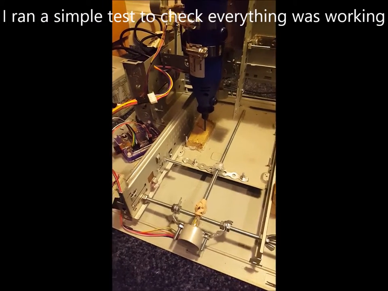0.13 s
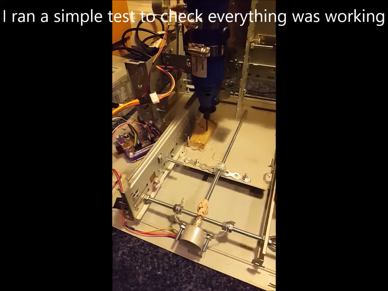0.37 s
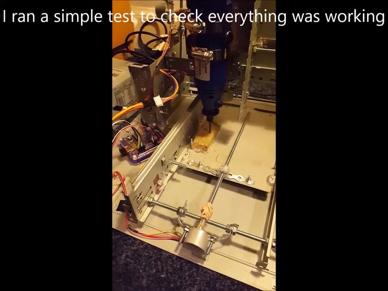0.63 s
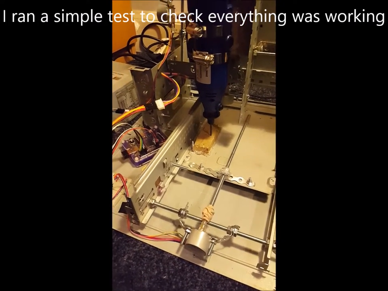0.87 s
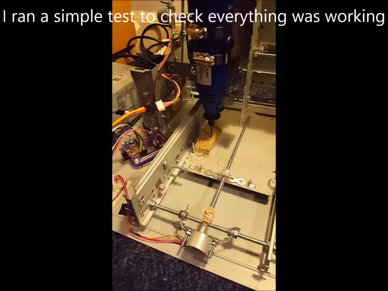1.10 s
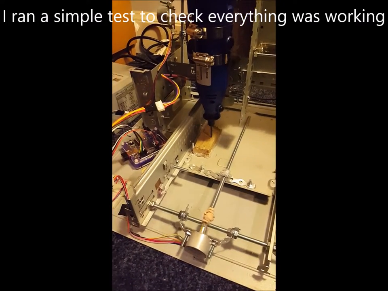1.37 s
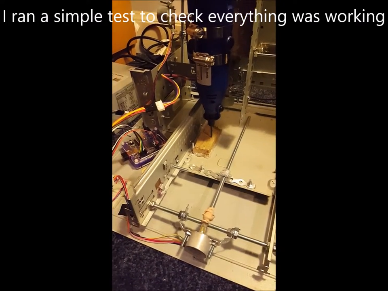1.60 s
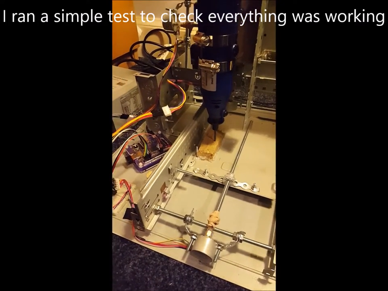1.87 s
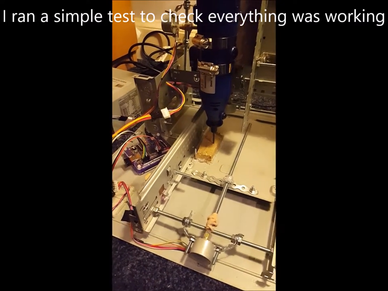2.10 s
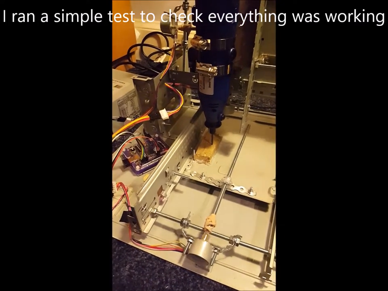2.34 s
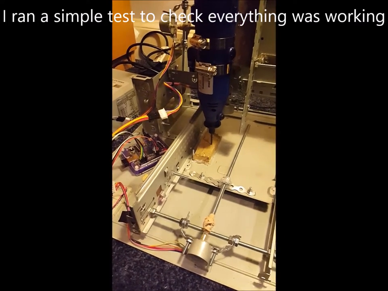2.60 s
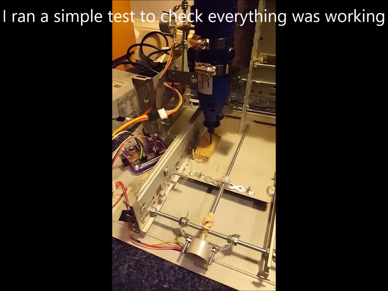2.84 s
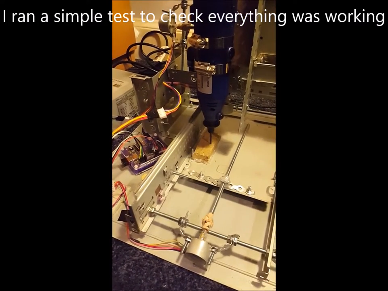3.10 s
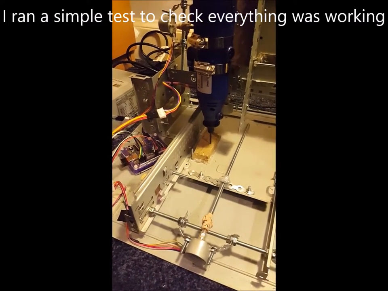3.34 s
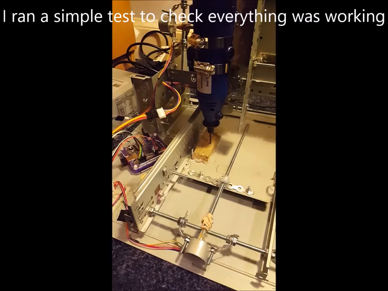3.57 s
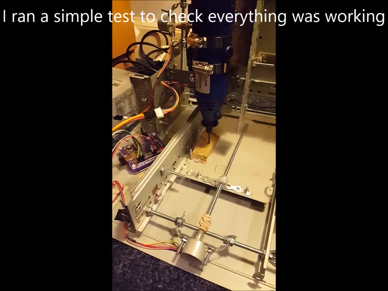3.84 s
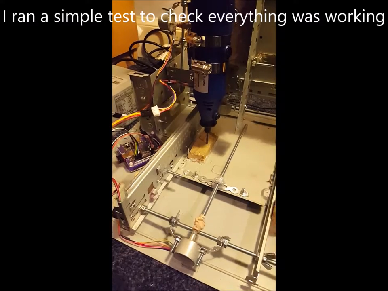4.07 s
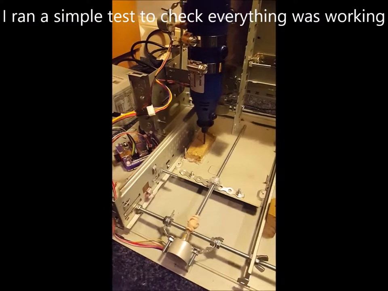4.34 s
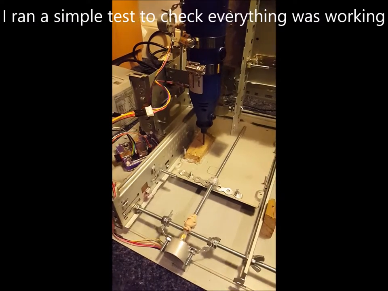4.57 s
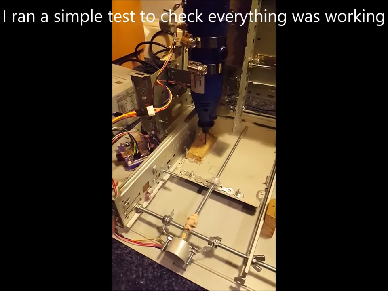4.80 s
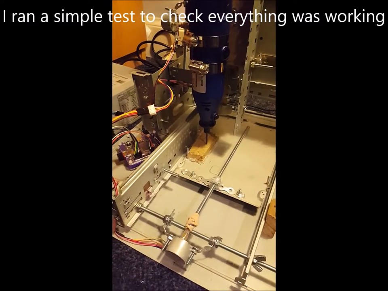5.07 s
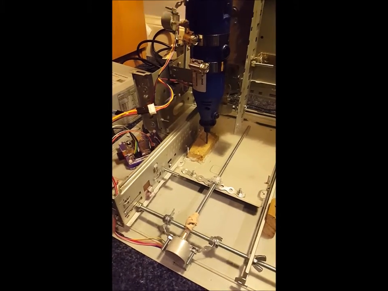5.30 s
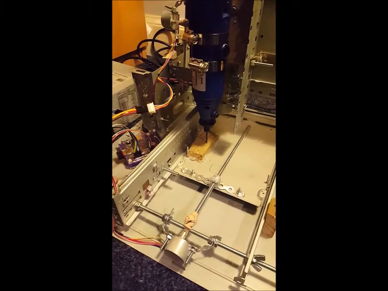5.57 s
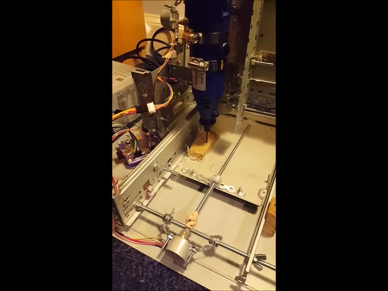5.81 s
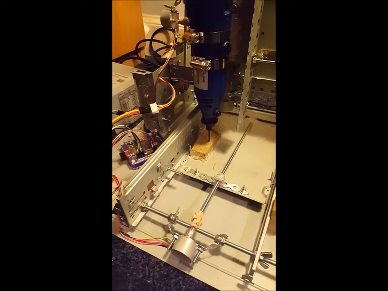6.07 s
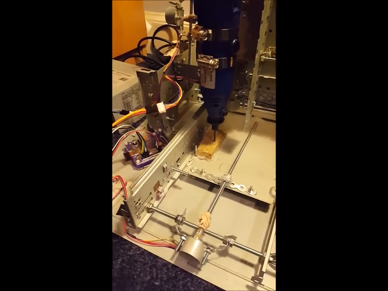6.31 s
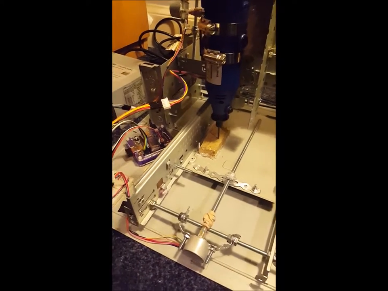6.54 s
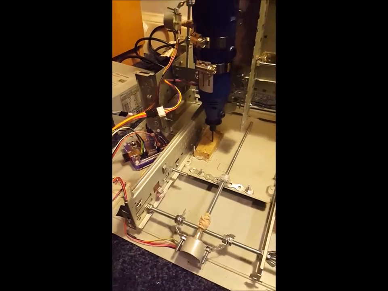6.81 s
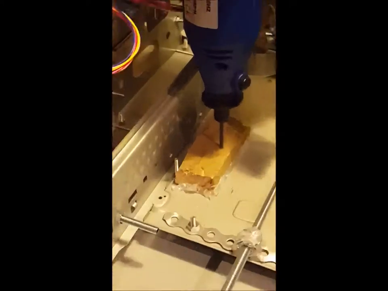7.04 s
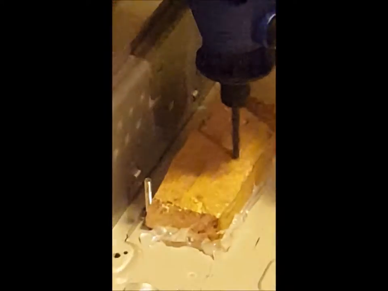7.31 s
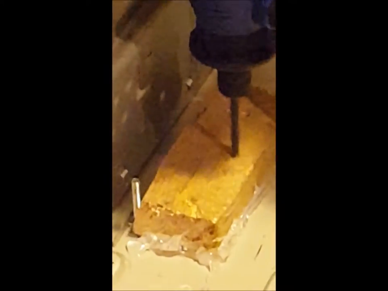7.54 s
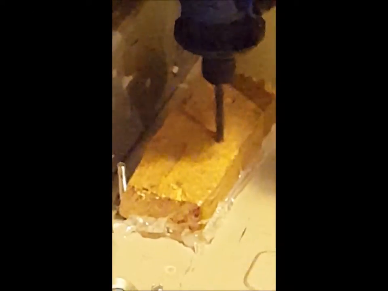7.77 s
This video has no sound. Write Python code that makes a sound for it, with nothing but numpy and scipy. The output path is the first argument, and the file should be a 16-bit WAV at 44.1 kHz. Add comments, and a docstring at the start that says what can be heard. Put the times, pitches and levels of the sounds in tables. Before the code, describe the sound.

Steady electric spindle whine, buzzy and metallic, with many stacked overtones beating gently against each other. Bright, grainy hiss from torn wood and cooling air rides on top, and the frame adds a midrange rattling rush. Loudness and colour drift with the load, strongest near four seconds, never stopping. Close, fairly dry room, slightly wide stereo.

```python
"""Rotary tool cutting wood

A small rotary tool on a home-built machine spins near 20 000 turns a minute as its bit feeds into wood.
Shaft orders, a bearing that slips slightly behind the shaft, a slow whirl and mains ripple sum to the whine.
Frame noise, chips and cooling air are filtered noise pulsing with shaft and whirl, over a low hum and rumble.
Two spaced microphones hear it: the noise differs between them and partly reaches the right one later."""
import sys
import numpy as np
from scipy import signal
from scipy.fft import rfft, irfft, next_fast_len
from scipy.io import wavfile
from scipy.ndimage import uniform_filter1d

SR = 44100
rng = np.random.default_rng(int(sys.argv[2]) if len(sys.argv) > 2 else 0)


def bounce(signal):
    """Save signal as a 16-bit WAV file at the path given by the first command-line argument."""
    frames = np.transpose(np.atleast_2d(signal))
    limited = np.clip(frames, -1, 1)
    pcm = np.round(limited * 32767).astype(np.int16)
    wavfile.write(sys.argv[1], SR, pcm)


def natural_amplitude(level_db):
    """Convert a level in decibels to a linear amplitude factor, elementwise."""
    exponent = np.asarray(level_db, float) / 20
    return 10 ** exponent


N = 348831
RIPPLE_HZ = 100  # mains ripple


def unit(x):
    """Scaled to rms 1."""
    return x / np.sqrt(np.mean(np.abs(x) ** 2) + 1e-20)


def along(points, hz):
    """Reads (f/Hz, value) points on a log frequency axis."""
    f, v = np.transpose(points)
    return np.interp(np.log(hz + 1), np.log(f + 1), v)


def curves(rows):
    """One value per sample for each column after the time."""
    s, *cols = np.transpose(rows)
    return [np.interp(np.arange(N) / SR, s, c) for c in cols]


def wobble(rate):
    """A random curve with rate knots a second, joined by straight lines."""
    knots = rng.standard_normal(int(8 * rate) + 2)
    return np.interp(np.arange(N) * rate / SR, np.arange(len(knots)), knots)


def angle(hz):
    """Running phase of a frequency curve, in radians."""
    return 2 * np.pi * np.cumsum(hz) / SR


def bump(s, db, half_s):
    """A smooth swell or dip in dB around a moment; half_s is where it has fallen to 1/e."""
    return db * np.exp(-((np.arange(N) / SR - s) / half_s) ** 2)


# The strongest partials: shaft order, bearing slips
STRONG_PARTIALS = [(1, 0), (2, 0), (4, 0), (5, 0), (7, 1), (8, 1), (9, 1), (11, 1), (12, 1), (13, 1),
                   (10, 1), (16, 2), (17, 2), (18, 2), (3, 0)]
# How each strong partial answers: load/(dB per dB), whirl/(dB per dB), full lasting shift/dB,
# first wandering/dB, second wandering/dB
STRONG_ANSWERS = [(0.78, -0.047, -0.9, -0.5, 2.5), (1.49, -0.099, 1.4, 0.9, -0.4),
                  (0.88, 0.088, -2.1, -1, 5), (1.47, -0.007, 0.8, -2, -4.5), (0.9, -0.17, 1.5, -0.5, 1.5),
                  (0.96, 0.032, 10.5, -3, 2.5), (1.6, 0.058, -0.6, 0.16, 0.1), (1.2, -0.086, -5, -0.3, 4.5),
                  (3, -0.28, 8.5, 4, -0.5), (3.04, -0.53, 4, 6, -0.7), (1.2, -0.0044, -1, 0, -1.5),
                  (2.9, -0.23, 5, 2.5, -2), (1.5, -0.06, -2, 1.5, -4), (2.8, -0.16, 13, 2.5, 0.1),
                  (2.03, -0.16, 1.5, -1, 2)]


def strong_swells(load_db, shake_db, drifts):
    """Each strong partial gains or loses level with load, whirl and the drifts of the whine's colour."""
    return dict(zip(STRONG_PARTIALS, np.array(STRONG_ANSWERS) @ [load_db, shake_db, *drifts]))


# Whine partials: shaft order, bearing slips subtracted
WHINE_ORDERS = [(1, 0), (2, 0), (3, 0), (4, 0), (5, 0), (6, 0), (7, 0), (8, 0), (9, 0), (13, 0), (17, 0),
                (19, 0), (21, 0), (23, 0), (24, 0), (25, 0), (26, 0), (29, 0), (6, 1), (7, 1), (8, 1),
                (9, 1), (10, 1), (11, 1), (12, 1), (13, 1), (14, 1), (15, 1), (16, 1), (17, 1), (20, 1),
                (22, 1), (23, 1), (16, 2), (17, 2), (18, 2), (19, 2), (20, 2), (21, 2), (22, 2), (23, 2),
                (24, 2), (25, 3), (26, 3), (28, 3)]
# The same partials in an ordinary cut: mid level/dB, side minus mid/dB, side phase/rad,
# whirl sideband below/dB, whirl sideband above/dB
WHINE_LEVELS = [(-48, -8.5, 1.44, -21, -29), (-43, -7, 1.0, -17, -23.5), (-55, -0.5, 1.5, -12.5, -14),
                (-45, 2, 1.63, -17.5, -35), (-45.5, 0, 1.03, -13, -12.5), (-59.5, -2, -1, -9, -34),
                (-50.5, 4, 0.3, -12, -17), (-51, -8, 2, -12, -15), (-50, 2, 5.5, -15, -13),
                (-52.6, -3.1, 0, -13, -9), (-62, 6, 2.5, -20, -13), (-55, -1.1, -1, -10, -19),
                (-63, 2.9, 1.3, -13, -18), (-56.5, -1.0, 2.9, -17, -15), (-66, -8, -2, -19, -15),
                (-63.1, -1, -3, -16, -16), (-65, -8, -0.1, -16, -22), (-66.1, -1.6, 1, -16, -19),
                (-53, 5, 1.5, -18, -23), (-46.5, 9, 0, -8, -13), (-45, 4, 2, -22, -18),
                (-36, -13, 3.5, -18, -14), (-44.5, 3.8, 2, -17, -5.5), (-43.5, -0.3, -2.16, -8.5, -9.5),
                (-47, -2, -1.6, -9, -6), (-49, 2.5, -2.0, -10, -17), (-55, 2, -4, -16, -13),
                (-58, -4.0, 3, -22, -10), (-54.5, -2.1, -5, -14, -7), (-64, -1, 4, -5, -20),
                (-64, -0.1, -1, -13, -7), (-61.0, 7, 2.5, -12, -2), (-61, -5, 1.5, -8, -6),
                (-51.5, 1, -2.5, -24, -17), (-52, -9, -2.8, -4, -6), (-52, -3, 3.5, -8, -11.5),
                (-55, -4, 3, -1, -7), (-61, -0.3, -1.5, -11, -3), (-55.5, 8, 1.7, -10, -7),
                (-59.5, 1, 3, -14, -12), (-55, -3, 1.5, -6, -11), (-60, -2, 1, -10, -10),
                (-60.5, 0, 1, -12, -12), (-62, 0, -2, -10, -10), (-67, 0, 0, -10, -10)]
# Sidebands of shaft orders 1 to 9 in an ordinary cut: mains below/dB, mains above/dB,
# twice the whirl below/dB, ball cage above/dB
ORDER_SIDEBANDS = [(-34, -25, -40, -33), (-33, -17, -40, -23), (-14, -19, -29, -20), (-16, -12, -14, -24),
                   (-19, -15, -26, -15), (-12, -17, -10, -16), (-27, -18, -28, -9), (-9, -10, -18, -15),
                   (-19, -18, -22, -16)]
# Moments when all bearing partials sink: t/s, level/dB, half length/s
BEARING_DIPS = [(1.09, -5.5, .1), (1.745, -9, 0.084), (3.995, -4, 0.12)]
# Moments when one partial alone swells or sinks: t/s, level/dB, half length/s
PARTIAL_FLARES = [(0.802, 4, .12), (2.9, -7, 0.074), (3.17, 2.5, 0.21), (3.45, -10, 0.062),
                  (5.85, -4, 0.33), (6.2, -3, .12), (6.7, 4.5, 0.13), (6.7, -2, .12), (7.448, 3, 0.23)]
# The partial each of these moments belongs to: shaft order, bearing slips
FLARING_PARTIALS = [(9, 1), (4, 0), (4, 0), (4, 0), (10, 1), (8, 1), (11, 1), (18, 2), (5, 0)]


def whine(shaft, slip, whirl, load_db, whirl_db, swells):
    """Rotating partials carry whirl, mains and ball cage sidebands and drift between the microphones."""
    cage_per_turn = .422  # ball cage turns per shaft turn
    mains = np.exp(1j * angle(np.full(N, RIPPLE_HZ)))
    cage = np.exp(1j * cage_per_turn * shaft)
    sidebands = dict(enumerate(ORDER_SIDEBANDS, 1))
    dip_db = sum(bump(*dip) for dip in BEARING_DIPS)
    mid, side = np.zeros(N), np.zeros(N)
    for partial, (db, side_db, side_rad, below_db, above_db) in zip(WHINE_ORDERS, WHINE_LEVELS):
        order, slips = partial
        # random phases, so the sidebands do not all pulse together
        turn = np.exp(2j * np.pi * rng.random(7))
        wander = wobble(2.346)
        if partial in swells:
            level_db = db + swells[partial] + 0.19 * order * wander
        else:
            level_db = db + load_db + 2.36 * wander
        level_db = level_db + (slips > 0) * dip_db
        for flare, flaring in zip(PARTIAL_FLARES, FLARING_PARTIALS):
            if flaring == partial:
                level_db += bump(*flare)

        flutter = 0.009 * order * (wobble(30) + 1j * wobble(30))  # higher orders are rougher
        whirling = natural_amplitude(below_db) * turn[0] * whirl.conj() + natural_amplitude(above_db) * turn[1] * whirl
        if slips == 0 and order in sidebands:
            under_db, over_db, twice_db, cage_db = sidebands[order]
            whirling += natural_amplitude(twice_db) * turn[2] * whirl.conj() ** 2
            flutter += natural_amplitude(under_db) * turn[3] * mains.conj() + natural_amplitude(over_db) * turn[4] * mains
            flutter += natural_amplitude(cage_db) * turn[5] * cage
        # plain orders 7 to 13 sound weaker, so they beat gently against the slipping partials
        bare = .45 if slips == 0 and order in range(7, 14) else 1
        beat = bare + flutter + natural_amplitude(whirl_db + 0.44 * wobble(4.8)) * whirling
        tone = np.sqrt(2) * turn[6] * beat * np.exp(1j * (order * shaft - slips * slip))
        mid += natural_amplitude(level_db) * tone.real

        # the side follows the mid level only in part
        side_level_db = side_db + 0.48 * level_db + 0.53 * (db + load_db) + 0.041 * order * wobble(2.16)
        side_phase = side_rad + 0.079 * order * wobble(1.5)
        side += natural_amplitude(side_level_db) * (tone * np.exp(1j * side_phase)).real
    return np.array([mid + side, mid - side])


# Likeness of the noise at the two microphones: f/Hz, likeness (held within 0 to 1)
MIC_LIKENESS = [(60, 0.6), (500, 0), (1500, 1.64), (2200, -0.04), (8000, 0.23), (15000, -0.9)]
# Tilt of the noise between them: f/Hz, left minus right level/dB
MIC_TILT = [(60, -1), (600, -1.5), (1500, 9.5), (2500, 4.5), (3700, 1.5), (5500, -5.5), (8000, -1),
            (9300, 8.5), (11000, 1.5), (13000, 2), (15500, 3)]


def rush(spectrum, gate, patchy_db):
    """Stereo noise of rms 1, gated at the source, in random patches; the shared part reaches the right later."""
    right_lag_s = 0.00019
    grains = signal.stft(rng.standard_normal((2, N)) * gate, nperseg=512)[2]
    field = uniform_filter1d(rng.standard_normal(grains.shape[1:]), 5, 0)
    field = unit(uniform_filter1d(field, 12, 1))
    pair = signal.istft(grains * natural_amplitude(patchy_db * field), nperseg=512)[1][:, :N]
    m = next_fast_len(N + 8192)
    hz = np.fft.rfftfreq(m, 1 / SR)
    shared, own = rfft(pair, m) * natural_amplitude(along(spectrum, hz))
    alike = np.clip(along(MIC_LIKENESS, hz), 0, 1)
    tilt = natural_amplitude(along(MIC_TILT, hz) / 2)
    late = shared * np.exp(-2j * np.pi * hz * right_lag_s)
    right = alike * late + np.sqrt(1 - alike ** 2) * own
    return unit(irfft([shared * tilt, right / tilt], m)[:, :N])


def bite(shaft, sharp, spread_db):
    """A short burst once a turn, of uneven strength, as a flute tears a chip."""
    turns = ((shaft + np.pi) / (2 * np.pi)).astype(int)
    strength = natural_amplitude(spread_db * rng.standard_normal(turns[-1] + 1))
    return strength[turns] * np.exp(sharp * (np.cos(shaft) - 1))


def strike(tears, depth, whirl, whirl_depth_db):
    """Steady noise plus the bursts of the flutes, all stronger at one point of the whirl."""
    return (1 + depth * tears) * natural_amplitude(whirl_depth_db * whirl.real)


# Colour of the frame noise: f/Hz, relative level/dB
FRAME_SPECTRUM = [(40, -48), (100, -27), (150, -16.5), (450, -12.5), (550, -11.5), (750, -5.5),
                  (900, -12.5), (1050, -10.5), (1220, -1.5), (1500, -3), (1850, 1.5), (2150, -4.5),
                  (2600, -4), (3500, -13)]


def frame_noise(tears, whirl, load_db, shake_db, shift):
    """The frame answers the cut with mid-band noise that grows with load and whirl."""
    level_db = -39.5 + 0.82 * load_db + 0.1 * shake_db - 0.5 * shift
    noise = rush(FRAME_SPECTRUM, strike(tears, 0.21, whirl, 0.32), patchy_db=1.5)
    return natural_amplitude(level_db + 0.54 * wobble(6)) * noise


# Colour of the chip noise: f/Hz, relative level/dB
CHIP_SPECTRUM = [(1300, -50), (2100, -20.5), (2500, -7), (3100, 0.5), (3500, -2), (4100, 0.5), (4950, -3.5),
                 (5900, -2), (6500, -1), (7500, 0), (8500, 0), (9500, -11.5), (11000, -25)]


def chip_noise(tears, whirl, chip_db):
    """Torn chips hiss in the treble, in bursts once a turn over a steady floor."""
    noise = rush(CHIP_SPECTRUM, strike(tears, 0.42, whirl, 0.88), patchy_db=0.95)
    return natural_amplitude(chip_db + 2.0 + 0.58 * wobble(12)) * noise


# Colour of the cooling air: f/Hz, relative level/dB
AIR_SPECTRUM = [(5000, -50), (8000, -21), (10400, -8), (11500, -1), (12800, 4), (14500, 0.5), (15700, -4)]


def cooling_air(tears, whirl, load_db, shake_db):
    """Cooling air hisses in the high treble, in step with the shaft."""
    level_db = -40 + 0.79 * load_db + 0.025 * shake_db
    noise = rush(AIR_SPECTRUM, strike(tears, .35, whirl, .8), patchy_db=0.1)
    return natural_amplitude(level_db + .4 * wobble(12)) * noise


# Mains hum of the motor windings at ripple multiples 1 to 3, in an ordinary cut: level/dB
HUM_LEVELS = [-68.5, -66.5, -68.5]
# Colour of the rumble in the bench: f/Hz, relative level/dB
BENCH_SPECTRUM = [(20, -26), (35, -10), (55, 4), (80, 0), (150, -15), (250, -28), (500, -60)]


def hum(whirl, whirl_tone_db, load_db):
    """Mains hum, and the whirl itself as a nearly centred tone and a low rumble in the bench."""
    t = np.arange(N) / SR
    windings = np.zeros(N)
    for multiple, db in enumerate(HUM_LEVELS, 1):
        windings += natural_amplitude(db + 0.78 * wobble(6.6)) * np.sin(2 * np.pi * multiple * RIPPLE_HZ * t)
    tones = np.sqrt(2) * (natural_amplitude(load_db) * windings + natural_amplitude(whirl_tone_db) * whirl.real)
    tones = tones * natural_amplitude([[-.6], [.6]])  # slightly to the right
    rumble_gain = natural_amplitude(whirl_tone_db - 8.0) + natural_amplitude(2.4 * load_db - 67)
    return tones + rumble_gain * rush(BENCH_SPECTRUM, 1, patchy_db=4.0)


# Motion of the tool: t/s, shaft f/Hz, bearing slip behind the shaft f/Hz, whirl f/Hz
TOOL_SPEED = [(0, 331.3, 4.5, 57.3), (.5, 331.06, 3.5, 57.5), (.84, 330.75, 2.5, 57.6),
              (1.01, 331.31, 6, 57), (1.51, 332.8, 8.5, 57.6), (1.68, 332.9, 6.4, 56),
              (1.85, 333.45, 10, 56.4), (2.02, 333, 7.9, 56.4), (2.19, 333.3, 7.6, 56.1),
              (2.69, 332.58, 6.4, 55.8), (3.1, 332.1, 8.1, 57.1), (3.53, 332.14, 7.2, 57.2),
              (3.7, 331.44, .9, 58.6), (3.87, 331.67, 7.3, 58.2), (4.04, 332.38, 6.6, 58),
              (4.38, 332.54, 7.5, 58.4), (4.54, 333.16, 7.5, 57), (5.39, 333.25, 7.4, 57.1),
              (5.68, 332.33, 4.2, 57.4), (6.06, 332.28, 5.2, 57), (6.56, 331.9, 1.6, 58.1),
              (6.9, 332.16, 4, 59.1), (7.3, 332.8, 4.3, 58.6), (7.91, 332.75, 4, 56.7)]
# Effort of the cut: t/s, chip reference level/dB (the chips play 2 dB above it), whirl tone level/dB,
# then three drifts of the whine's colour, about -1 to 1: lasting shift, first wandering, second wandering
CUT_EFFORT = [(0.0, -43.5, -105, 0.36, 0.42, -0.13), (0.3, -42.5, -101.0, 0.55, 0.53, -0.14),
              (0.86, -40.5, -101.0, -0.34, -0.013, -0.15), (1.1, -40, -76, -0.48, -0.61, 0.69),
              (1.3, -39.5, -89, -0.52, -0.34, 0.46), (1.52, -39.5, -82, -0.65, -0.65, 0.2),
              (1.75, -38, -67, -0.41, -0.65, 0.15), (1.95, -38.5, -71.5, -0.22, 0.37, 0.31),
              (2.4, -37.5, -64, -0.37, -0.18, 0.26), (2.85, -37, -69, -0.48, 0.88, -0.62),
              (3.2, -35.5, -75, -0.38, 0.28, 0.3), (3.44, -36.0, -73, -0.61, 0.14, -0.42),
              (3.68, -36, -91, -0.67, -0.078, -0.75), (3.95, -35, -77, -0.61, -0.63, 0.23),
              (4.3, -35.5, -84, -0.4, -1.2, 0.2), (4.7, -36.5, -71.5, 0.34, -0.61, 0.038),
              (5.4, -37, -73, 0.61, -0.17, 0.08), (5.8, -37.5, -77.0, 0.57, 0.65, 0.74),
              (6.2, -37.5, -71, 0.38, 1, 0.35), (6.45, -36.0, -84, 0.35, 0.084, 0.3),
              (6.7, -36.5, -88, 0.2, -0.01, 0.37), (7.15, -37, -79, 0.59, -0.77, 0.21),
              (7.5, -37.5, -78, 0.75, -0.84, -0.47), (7.91, -39, -75.5, 0.97, 0.43, -0.54)]


def scene():
    """Shaft, whirl and load drive the whine, the hum and three noises together."""
    shaft_hz, slip_hz, whirl_hz = curves(TOOL_SPEED)
    chip_db, whirl_tone_db, *drifts = curves(CUT_EFFORT)
    shaft, slip = angle(shaft_hz), angle(slip_hz)
    whirl = np.exp(1j * (angle(whirl_hz) + 0.16 * wobble(5)))
    # load and whirl relative to an ordinary cut
    load_db, shake_db = chip_db + 37.1, whirl_tone_db + 76
    swells = strong_swells(load_db, shake_db, drifts)
    tears = bite(shaft, sharp=13, spread_db=5.5)

    # the whirl sidebands grow with the whirl
    tool = whine(shaft, slip, whirl, load_db, 0.46 * shake_db, swells)
    tool = tool + frame_noise(tears, whirl, load_db, shake_db, drifts[0])
    tool = tool + chip_noise(tears, whirl, chip_db)
    tool = tool + cooling_air(tears, whirl, load_db, shake_db)
    pan_db = -0.9 * drifts[0]  # left minus right, follows the lasting shift
    pan = natural_amplitude(pan_db * [[.5], [-.5]])
    return hum(whirl, whirl_tone_db + 1.8 * wobble(7), load_db) + pan * tool


def band_limit(x):
    """A steep low-pass at the top of the band."""
    return signal.sosfilt(signal.butter(12, 16680, fs=SR, output="sos"), x)


def record(dry):
    """The recorder keeps nothing above its band limit."""
    top_hz = 15730
    m = next_fast_len(N)
    in_band = np.fft.rfftfreq(m, 1 / SR) < top_hz
    kept = irfft(rfft(dry, m) * in_band, m)[:, :N]
    return band_limit(kept)


dry = scene()
out = record(dry)
bounce(out)
```